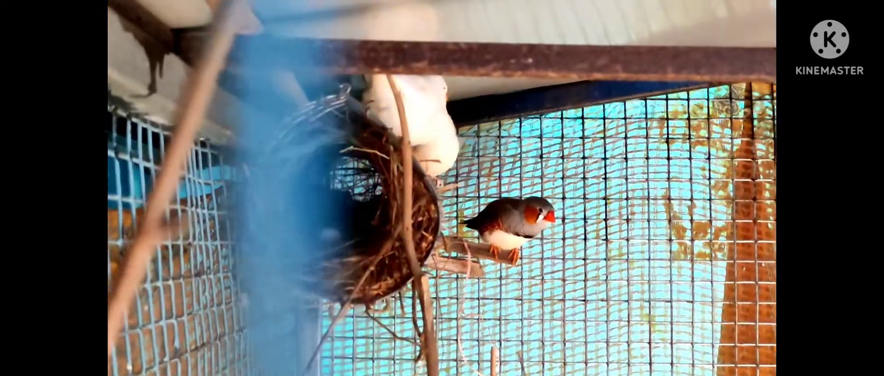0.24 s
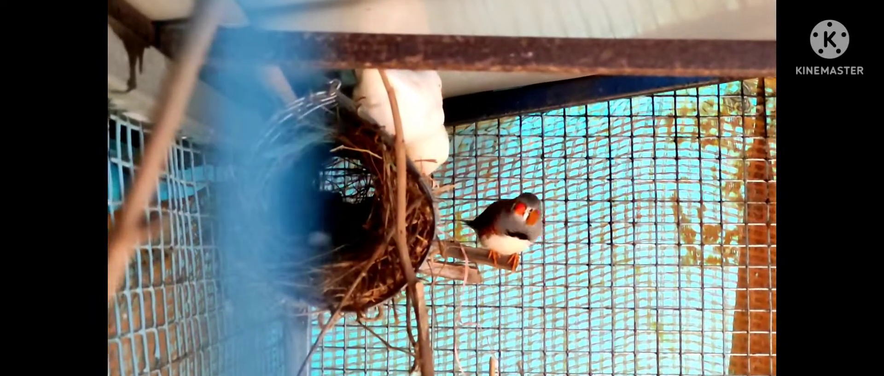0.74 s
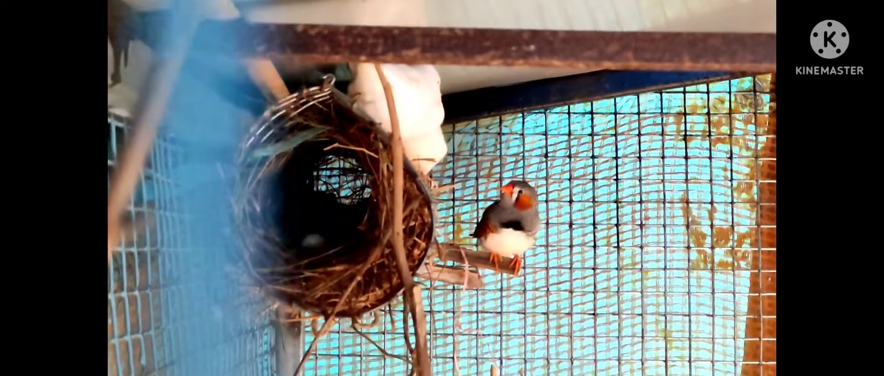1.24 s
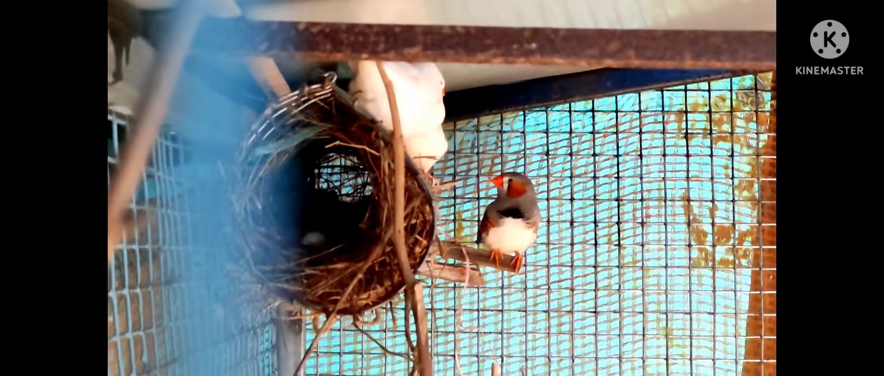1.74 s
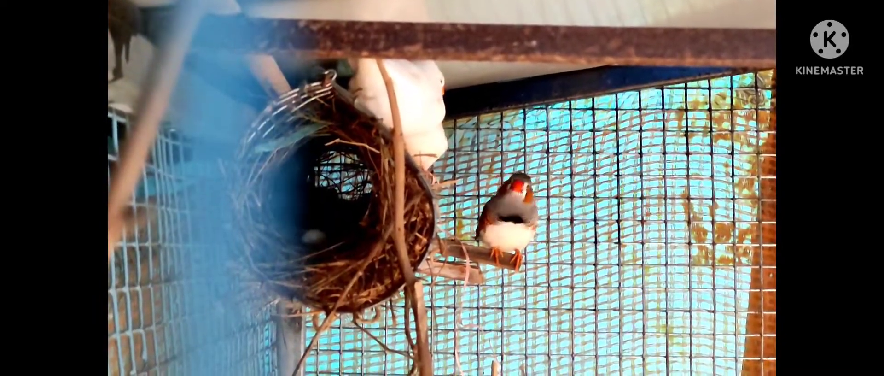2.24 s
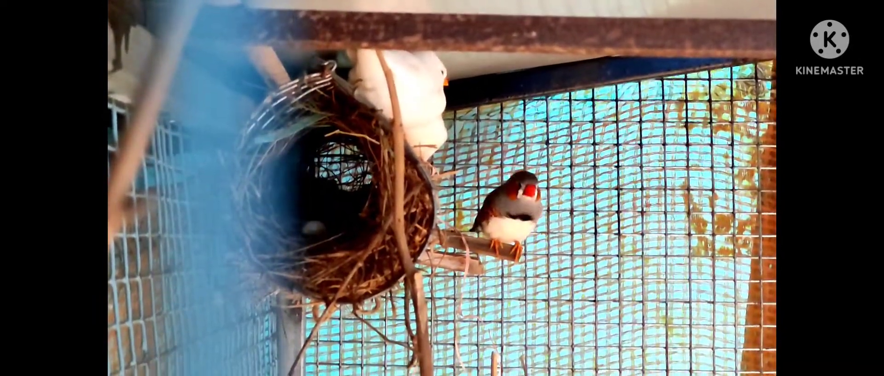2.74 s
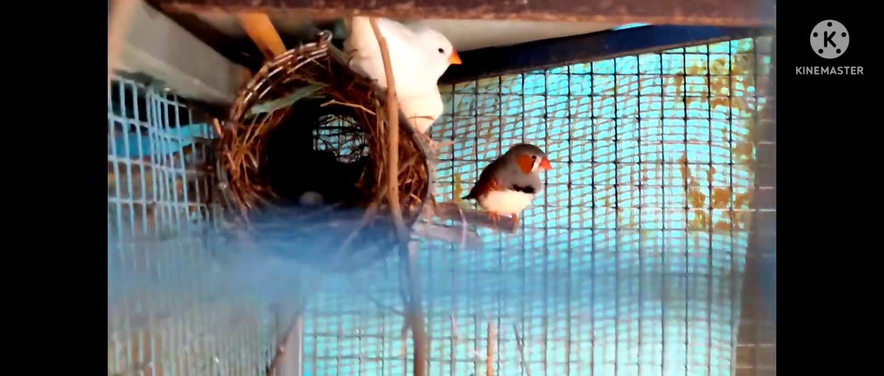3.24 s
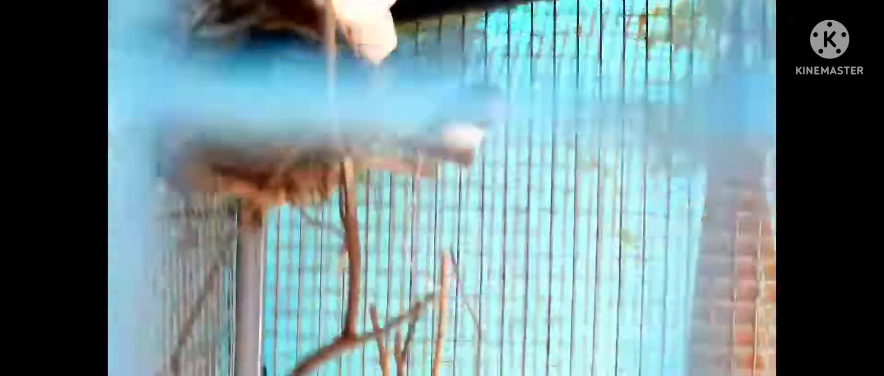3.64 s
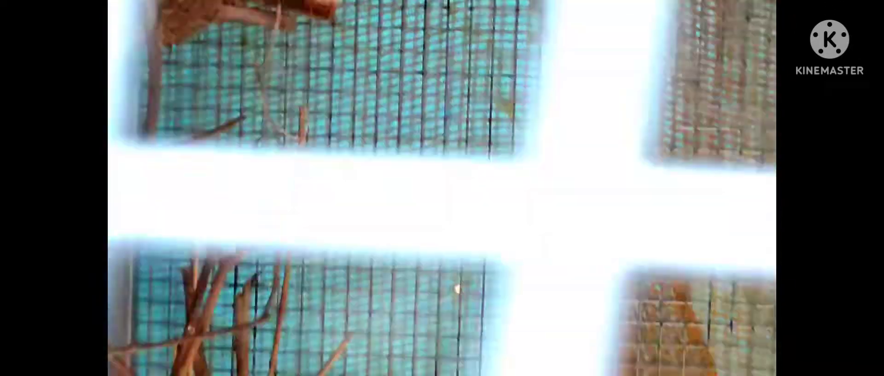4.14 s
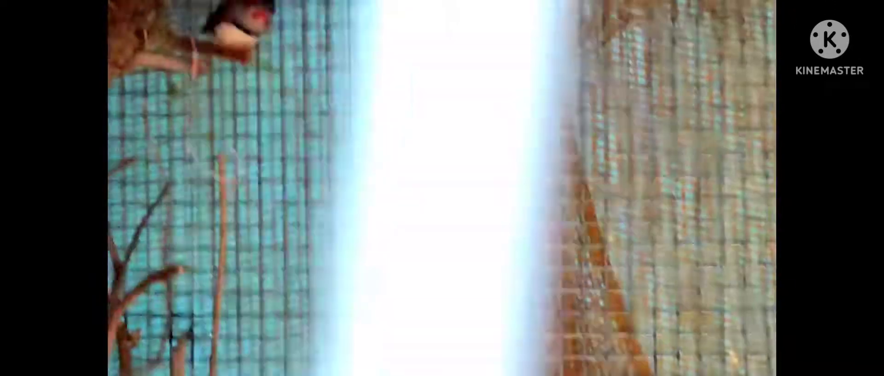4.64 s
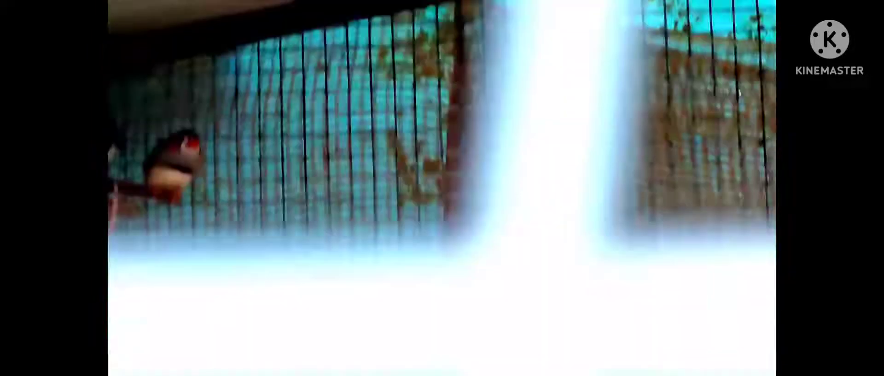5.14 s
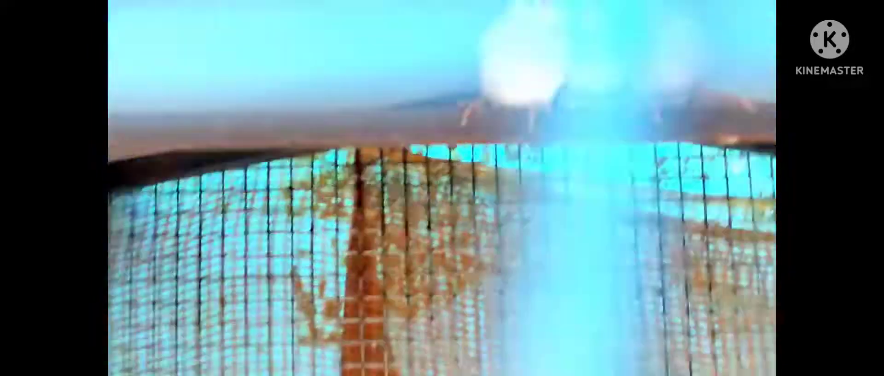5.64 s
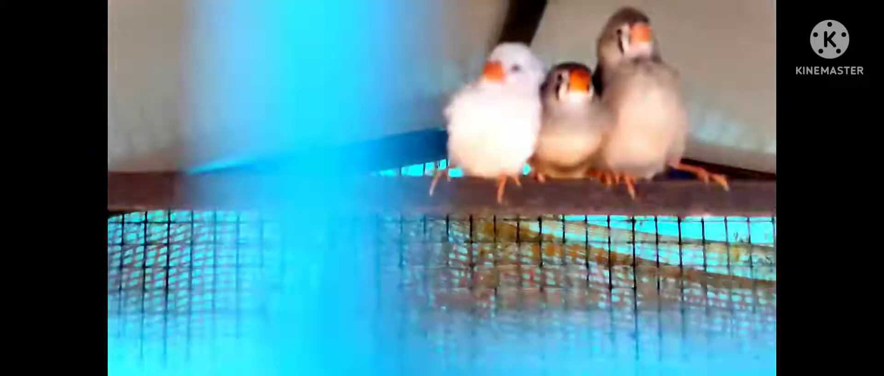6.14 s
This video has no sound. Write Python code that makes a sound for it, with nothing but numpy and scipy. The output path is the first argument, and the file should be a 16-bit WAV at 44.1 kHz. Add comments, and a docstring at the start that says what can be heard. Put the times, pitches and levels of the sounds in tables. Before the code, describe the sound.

Finch chicks beg in steady raspy pulses while adults give short nasal calls, then flutter and squeal loudly in a quick scuffle.

```python
"""Chicks rasp for food and adults whine and call: zebra finches, heard just outside a small wire aviary.
The adults trade falling 'tet' calls and flat nasal 'stack' calls, and a short squabble brings wing beats
and loud squeals. Their tones come from the syrinx, a bird's voice box; the chicks' rasps are rushing air
with a thin squeak. Feet tap on perches, something brushes the mesh twice, and boards and walls echo.
Insects shrill in the quiet air, a hand-held microphone rumbles, and a faint low rustle comes last."""
import sys
import numpy as np
from scipy import signal
from scipy.fft import rfft, irfft, next_fast_len
from scipy.io import wavfile

SR = 44100
rng = np.random.default_rng(int(sys.argv[2]) if len(sys.argv) > 2 else 0)


def master(y):
    """Save y as 16-bit WAV."""
    cut = np.clip(np.atleast_2d(y).T, -1, 1)
    pcm = np.round(cut * 32767)  # scale
    wavfile.write(sys.argv[1], SR, pcm.astype(np.int16))


N = 281799
TOP_HZ = 14300  # upper limit of the treble

# Levels are set before mixing. Roughness runs from 0 (clear) to 1 (hoarse). Pan is left minus right.
# Falling calls. Each row: start in seconds, greatest length in seconds, level in dB.
TET_CALLS = [(0.297, 0.061, -39.5), (0.847, 0.062, -39.5), (1.968, 0.086, -40.5), (2.724, 0.057, -40.5),
             (3.213, 0.11, -39), (4.65, 0.086, -39)]
# How a tet unfolds. Each row: seconds since its start, pitch in Hz, level in dB, roughness (capped at 1).
TET_SHAPE = [(0, 1036, -5.5, 1.08), (.018, 1036, -5.5, 1.11), (.03, 990, 1, .45), (.05, 841.6, -3, 0.27),
             (.072, 705, -3.5, .33), (.096, 625, -6, 0.42)]
# Flat calls. Each row: start and length in seconds, pitch in Hz, mid-call rise in Hz, level in dB.
STACK_CALLS = [(0.455, 0.094, 485, 16.6, -45), (1.232, 0.093, 549, 38.2, -44),
               (2.153, 0.084, 466.6, 24.6, -49.5), (2.934, 0.107, 537, 52, -50.5),
               (4.407, 0.086, 571, 29.6, -51.5), (4.594, 0.074, 466, 3.94, -48.5)]
# How a stack unfolds. Each row: share of its length, share of the rise, level in dB, roughness.
STACK_SHAPE = [(0, .1, -22, .3), (.1, 0.24, 0.5, 0.1), (.27, -0.1, -1.5, 0), (.52, 0.56, 1, 0.14),
               (.78, 0.95, 1, 0), (1, -.4, -1, 0.1)]
# The squabble. Each row: peak time, rise and fall in seconds, pitch in Hz at the start, peak and end,
# level in dB, roughness at the peak, pan in dB.
SQUEAL_CALLS = [(3.668, 0.027, 0.029, 5350, 4760, 4664, -25, 0.17, -4),
                (3.764, 0.044, 0.056, 2326, 4240, 4050, -28, 0.37, -0.5),
                (3.88, 0.0616, .018, 2300, 3807, 3746, -36, 0.42, -6),
                (4.1, .031, 0.04, 5230, 4635, 4660, -22.5, 0.49, -4),
                (4.141, .027, .068, 4240, 4377, 3556, -14.5, .13, -3),
                (4.221, .02, 0.031, 3990, 3875, 3665, -17.5, 0.02, -6.5)]
# Whines that break into a whistle. Each row: start, break and end in seconds, level in dB.
WHINE_CALLS = [(0, 0.094, .15, -44), (1.29, 1.374, 1.406, -37), (1.47, 1.546, 1.592, -37)]
# One chick's slow begging. Each row: start and end in seconds, level in dB, voicing (0 air, 1 squeak).
SLOW_BEGGING = [(-.05, 0.113, -46.5, .02), (0.167, 0.364, -50, .02), (0.427, 0.587, -50, 0.28),
                (0.661, .82, -49, 0.09), (.88, 1.064, -51, 0.03), (1.139, 1.385, -46.5, 0.22),
                (1.406, 1.584, -45, 0.5), (1.668, 1.889, -46.5, 0.68), (1.912, 2.123, -46.5, 0.6),
                (2.178, 2.402, -47.5, 0.6), (2.466, 2.632, -48, 0.44), (2.727, 2.895, -48, 0.34),
                (2.988, 3.203, -50, 0.29), (3.274, 3.481, -48, 0.08), (3.545, 3.69, -48.5, 0.43)]
# Another chick's quicker, shriller begging. Each row: the same four values, then squeak pitch in Hz.
QUICK_BEGGING = [(3.78, 3.99, -43.5, .1, 4400), (4.26, 4.41, -51.5, 0.08, 3880),
                 (4.43, 4.62, -49.5, 0.2, 4650), (4.68, 4.92, -46, 0.24, 4151),
                 (4.97, 5.16, -46.5, 0, 4803), (5.2, 5.38, -46.5, 0.08, 5060),
                 (5.42, 5.58, -46.5, 0.07, 4920), (5.62, 5.78, -49, 0, 4650),
                 (5.815, 5.96, -47.5, 0.16, 4760), (5.995, 6.125, -47.5, 0.15, 5174),
                 (6.16, 6.3, -45, 0.27, 4380), (6.33, 6.46, -44.5, 0.01, 4700)]
# How wide each chick opens its beak. Each row: time in seconds, hiss in dB, shrill resonance in dB.
SLOW_BEAK_OPENING = [(.2, 2, 1.5), (.95, 2, 5.5), (1.45, 0, -18), (2.3, 4, -16), (2.601, -5.5, -6),
                     (3.6, -2.5, -13)]
QUICK_BEAK_OPENING = [(3.8, -1, -1.2), (6.298, 0.62, -0.4)]
# Fluttering swishes: wing beats, then two late brushes against the wire mesh.
# Each row: peak time, rise and fall in seconds, level in dB.
SWISHES = [(3.47, 0.13, 0.12, -53.5), (3.78, 0.13, 0.11, -42.5), (4.1, .2, 0.62, -50),
           (4.62, 0.21, 0.2, -54), (5.575, 0.049, 0.033, -48), (5.69, .05, 0.1, -47.5)]
# Feet and beaks hitting perches and mesh. Each row: time in seconds, level in dB.
PERCH_TAPS = [(2.027, -42), (2.088, -46), (2.198, -48.5), (2.379, -51), (2.655, -55), (3.424, -57),
              (3.665, -51), (4.631, -51), (5.385, -52.5), (5.528, -48), (5.541, -47), (5.61, -43.5),
              (5.625, -47.5), (6.043, -57.5), (6.083, -51.5)]
# The tones a perch rings with. Each row: pitch in Hz, level in dB, seconds to fade by 60 dB.
PERCH_TONES = [(316, -5, 0.07), (558, -2.5, 0.055), (702, -5.5, 0.04), (855, -2.5, 0.044), (996, -9, 0.026),
               (1220, -10, 0.0047), (1529, -4, 0.019), (1597, -22, 0.039)]
# Low rumbles and rubs; the last is a faint low rustle at the end.
# Each row: peak time, rise and fall in seconds, rumble and rub in dB.
RUMBLES_AND_RUBS = [(3.98, .06, 0.93, -44, -62.5), (4.52, .3, 0.86, -44.5, -63),
                    (5.58, 0.15, 0.29, -56, -55), (5.76, .13, 0.065, -45, -49),
                    (6.36, .35, 0.14, -65, -59.5)]
# Shrill insects. Each row: pitch in Hz, level in dB.
INSECT_TONES = [(10660, -65), (10830, -68.5), (11130, -65), (11430, -75)]

# Tone colours: how strong the low and high parts of a sound are. Each row: frequency in Hz, level in dB.
TET_COLOUR = [(400, -17.5), (700, -6), (1000, -8.5), (1400, -0.5), (1950, -6), (2500, -6), (3100, -8.5),
              (3700, 1.5), (4300, -10), (5500, -15.5), (8000, -25), (14000, -42)]  # the adults' throats, one for each kind of voice
STACK_COLOUR = [(400, -25), (560, -5.5), (1100, -1), (1500, 2.5), (2000, 3), (2800, -2), (3500, -7.5),
                (4500, -8), (5500, -25.5), (7500, -23), (9000, -42.5), (14000, -21)]
SQUEAL_COLOUR = [(1000, -24), (1800, -15), (2400, -5), (3000, 0), (3800, 0.5), (4700, -2), (5600, -6),
                 (7000, -11), (8600, -19.5), (10500, -28), (12500, -21.5), (14500, -28)]
WHINE_COLOUR = [(900, -44.5), (1400, -39), (1800, -1.5), (2400, 4), (3100, 5.5), (3500, 10.5), (4200, -1.5),
                (5500, -16), (8000, -16), (10000, -26), (14000, -61)]
SLIDE_COLOUR = [(1400, -6.5), (3100, -1), (4200, -17), (8000, -25), (14000, -51)]
SLOW_THROAT_COLOUR = [(1200, -26), (1700, -11), (1950, -5), (2130, 3), (2330, 3.5), (2550, -1.5),
                      (3000, -21.5), (3600, -42)]  # the chicks' throats and open beaks
SLOW_BEAK_COLOUR = [(1500, -30.5), (3100, -9), (3750, 3), (4200, 3), (4600, 5), (5200, -1), (6100, -4),
                    (7350, -3), (8000, -4.5), (8500, -19), (9800, -11.5), (14000, -40)]
QUICK_THROAT_COLOUR = [(1200, -18), (1540, -13), (1710, 1.5), (2100, -5.5), (2550, 3.5), (2800, -2.5),
                       (3100, -37), (3600, -36)]
QUICK_BEAK_COLOUR = [(2000, -19), (3150, -23), (3650, 0), (4200, -2.5), (4750, 2), (5250, 1.5),
                     (5900, -11.5), (6600, -11), (7700, -9.5), (8500, -23), (10000, -15.5), (14000, -29)]
SWISH_COLOUR = [(100, -15), (300, -1), (600, -1.5), (1500, 0), (3000, -1.5), (5000, -6), (7500, -4.5),
                (10000, -12), (14000, -15)]
TAP_COLOUR = [(150, -34), (380, -5.5), (560, 1.5), (1600, 3), (2600, -10), (6000, -17), (14000, -29)]  # hard perch and mesh give almost no bass
RUMBLE_COLOUR = [(15, -8.5), (25, 4), (29, -4), (34, -13.5), (55, -17), (130, -26.5), (250, -35.5),
                 (600, -47.5), (2000, -84)]  # very deep bass
RUB_COLOUR = [(40, -7), (90, -1.5), (230, -4), (400, -10), (900, -18), (3000, -48)]  # a low, dull rustle
INSECT_COLOUR = [(9800, -12), (10400, -24), (10650, 6), (11000, -1.5), (11500, 9.5), (11900, -18),
                 (13000, -18)]
AIR_COLOUR = [(25, 2.5), (50, -1), (66, -7), (77, 6.5), (92, -8.5), (225, -10), (480, -11.5), (750, -14.5),
              (1260, -18.5), (2100, -13.5), (3500, -17), (6000, -29), (9000, -36), (14000, -34.5)]
WALL_COLOUR = [(200, 8.5), (4000, 1.0), (8000, 1.0), (14000, -11)]


def syrinx(hz, db, rough, doubling, throat, jitter, rasp, harmonics):
    """The voice box buzzes through the throat; roughness shakes the pitch and adds rushing air."""
    size, rough, doubling = len(hz), np.clip(rough, 0, 1), np.clip(doubling, 0, 1)
    phase = phase_of(hz * (1 + jitter * rough * wander(size, 900)))
    tone, power = 0, 1e-12
    # doubling: every second vibration differs, which adds tones halfway between the harmonics
    for k in np.arange(1, 2 * harmonics + 1) / 2:
        gain = gain_at(k * hz, throat) * (k * hz < TOP_HZ) * (doubling if k % 1 else 1)
        tone += gain * np.sin(k * phase + rng.uniform(0, 2 * np.pi))
        power += gain ** 2 / 2
    air_share = np.clip(rasp * rough ** 2, 0, 1)
    voice = np.sqrt((1 - air_share) / power) * tone + np.sqrt(air_share) * noise(size, throat)
    return voice * undb(db) * fade(size, 0.0027)


def contact_calls():
    """Tets start hoarse and slide down until they are cut off; stacks hold a low, slightly arched pitch."""
    out = np.zeros((2, N))
    for start, length, level_db in TET_CALLS:
        hz, db, rough = (column[:int(length * SR)] for column in follow(TET_SHAPE))
        call = syrinx(hz, db + level_db, rough, 0.31 * rough ** 2, TET_COLOUR,
                      jitter=0.05, rasp=0.45, harmonics=14)
        add(out, start, call * fade(len(call), 0.0088), pan_db=-0.5, lag_ms=0.057)
    for start, length, pitch_hz, rise_hz, level_db in STACK_CALLS:
        rise, db, rough = follow(np.array(STACK_SHAPE) * [length, 1, 1, 1])
        call = syrinx(pitch_hz + rise * rise_hz, db + level_db, rough, 0.4 * rough ** 2, STACK_COLOUR,
                      jitter=0.13, rasp=0.63, harmonics=24)
        add(out, start, call, pan_db=1)
    return out


def squeals(edge_db=-15.5, onset_rough=0.53, fray=7, glide=1.3, swing_db=5):
    """Each squeal starts as a screech, clears towards a whistle at its peak and frays as it fades."""
    out = np.zeros((2, N))
    for peak, rise_s, fall_s, first_hz, peak_hz, last_hz, level_db, peak_rough, pan_db in SQUEAL_CALLS:
        before, after = ramps(rise_s, fall_s)
        # a glide above 1 makes the pitch linger at the peak
        hz = peak_hz + (first_hz - peak_hz) * before ** glide + (last_hz - peak_hz) * after ** glide
        db = level_db + edge_db * (before + after) ** 0.91
        rough = np.clip(peak_rough * (1 + fray * after ** 2) + onset_rough * before ** 2, 0, 1)
        call = syrinx(hz, db, rough, 0.74 * rough, SQUEAL_COLOUR, jitter=0.09, rasp=0.3, harmonics=4)
        # loudness and direction flutter quickly while the bird thrashes about
        flutter = unit(undb(2.2 * wander(len(call), 326.2)))
        add(out, peak - rise_s, call * flutter, pan_db + swing_db * wander(len(call), 80), lag_ms=-0.28)
    return out


def whines(whine_hz=1747, whistle_hz=1570, attack_s=0.017, release_s=0.021, slide_lead_s=0.012):
    """A hoarse note drops into a cleaner, slightly softer whistle while a second voice slides up."""
    out = np.zeros((2, N))
    for start, break_s, end, level_db in WHINE_CALLS:
        t = np.arange(start, end, 1 / SR)
        edge = np.maximum(1 - np.minimum((t - start) / attack_s, (end - t) / release_s), 0)
        broken = smooth_step(t - break_s, width_s=0.0063)
        db = level_db - 6 * edge ** 2 - 1.5 * broken
        hz = blend(whine_hz, whistle_hz, broken)
        rough = blend(0.85, 0.23, broken)
        whine = syrinx(hz, db - 5, rough, 0.75 * rough, WHINE_COLOUR,
                       jitter=0.0555, rasp=0.74, harmonics=7)
        add(out, start, whine, pan_db=6.5)
        # the other side of the syrinx slides up just ahead of the break
        slide_hz = blend(1680, 2966, smooth_step(t - break_s + slide_lead_s, width_s=0.00497))
        slide = syrinx(slide_hz, db - 6.5, rough=0.34, doubling=0, throat=SLIDE_COLOUR,
                       jitter=0.108, rasp=0.043, harmonics=4)
        add(out, start, slide, pan_db=-5)
    return out


def chick(rasps, opening, throat, beak, throat_db, hiss_db, squeak_db, grain_db, swell,
          pan_db, lag_ms, waver_hz, arch_hz, shrill_hz=5470, shrill_width_hz=380):
    """Air rushes through the throat and open beak; voicing trades that hiss for a thin, shaky squeak."""
    out = np.zeros((2, N))
    opening_s, *opening_db = np.transpose(opening)
    for start, end, level_db, voicing, squeak_hz in rasps:
        open_db, shrill_db = (np.interp((start + end) / 2, opening_s, db) for db in opening_db)
        size = int((end - start) * SR)
        effort = np.hanning(size)
        # the beak opens a little differently every time
        colour = np.array(beak) + rng.standard_normal((len(beak), 2)) * [50, 1]
        colour[:, 1] += shrill_db * np.exp(-((colour[:, 0] - shrill_hz) / shrill_width_hz) ** 2)
        breath = undb(throat_db) * np.sqrt(1 - voicing) * noise(size, throat)
        hiss = undb(hiss_db + open_db) * (1 - voicing) * noise(size, colour)
        # the squeak rises and falls with the effort of the call
        hz = squeak_hz + arch_hz * (effort - 0.75)
        hz += waver_hz * wander(size, 700) + 35 * wander(size, 29.94)
        tone = unit(np.sin(phase_of(hz)) * undb(4.8 * wander(size, 110.5)))
        squeak = undb(squeak_db) * np.sqrt(voicing) * tone
        grain = unit(undb(grain_db * wander(size, 343.8)))
        rasp = (breath + hiss + squeak) * grain * effort ** swell
        add(out, start, undb(level_db) * rasp, pan_db, lag_ms)
    return out


def swishes(pulse_hz=27, pulse_db=3, edge_db=-9.5):
    """Unevenly pulsing noise swells and fades: wing beats, then two late brushes against the mesh."""
    out = np.zeros((2, N))
    for peak, rise_s, fall_s, level_db in SWISHES:
        db = level_db + edge_db * sum(ramps(rise_s, fall_s))
        size = len(db)
        phase = phase_of(pulse_hz * (1 + 0.3 * wander(size, 21)))
        pulses = unit(undb(pulse_db * np.sin(phase) + 2.1 * wander(size, 300)))
        swish = noise(size, SWISH_COLOUR) * pulses
        add(out, peak - rise_s, swish * undb(db) * fade(size, 0.0069), pan_db=-6.5)
    return out


def taps(scrape_db=-4, scrape_s=0.0043, contact_s=0.0027):
    """A claw scuffs the perch for a moment and makes it ring."""
    out, t = np.zeros((2, N)), np.arange(SR // 8) / SR
    bass_cut = signal.butter(3, 430, "high", fs=SR, output="sos")
    for start, level_db in PERCH_TAPS:
        ring = 0
        for hz, db, ring_s in PERCH_TONES:
            gain = undb(db + 2 * rng.standard_normal())
            pitch = hz * (1 + 0.041 * rng.standard_normal())
            ring += gain * np.sin(2 * np.pi * pitch * t) * die_away(t, ring_s)
        push = noise(len(t), TAP_COLOUR) * np.exp(-t / contact_s)
        knock = unit(signal.fftconvolve(push, ring)[:len(t)])
        scrape = unit(noise(len(t), TAP_COLOUR) * np.exp(-t / scrape_s))
        tap = signal.sosfilt(bass_cut, knock + undb(scrape_db) * scrape)
        tap /= np.std(tap[:SR // 100])  # the first 10 ms set the level
        add(out, start, undb(level_db) * tap, pan_db=-1.5 + 5.5 * rng.standard_normal(), lag_ms=0.13)
    return out


def aviary(dry, near_db, near_s, far_db, far_s):
    """Close boards add a dense, short echo; the walls around add a fainter, longer ring."""
    t = np.arange(SR // 2) / SR
    echoes = []
    for channel in dry:
        near = rng.standard_normal(len(t)) * die_away(t, near_s) * (t > 0.001)
        far = noise(len(t), WALL_COLOUR) * die_away(t, far_s) * (t > 0.012)
        response = (undb(near_db) * unit(near) + undb(far_db) * unit(far)) / np.sqrt(len(t))
        echoes.append(signal.fftconvolve(channel, response)[:N])
    return dry + np.array(echoes)


def rumbles_and_rubs(edge_db=-15.5, side_db=-13, uneven_db=4.5):
    """Low rumbles and uneven rubs from the hand-held microphone; the last is just a faint low rustle."""
    out = np.zeros((2, N))
    for peak, rise_s, fall_s, rumble_db, rub_db in RUMBLES_AND_RUBS:
        swell = undb(edge_db * sum(ramps(rise_s, fall_s)))
        size = len(swell)
        rumble = undb(rumble_db) * noise(size, RUMBLE_COLOUR)
        rub = undb(rub_db + uneven_db * wander(size, 59.8)) * noise(size, RUB_COLOUR)
        add(out, peak - rise_s, (rumble + rub) * swell * fade(size, 0.0105))
        for pan_db in (-12, 12):
            side_rumble = undb(rumble_db + side_db) * noise(size, RUMBLE_COLOUR)
            add(out, peak - rise_s, side_rumble * swell * fade(size, 0.02), pan_db)
    return out


def insects(chorus_db=-64, waver_hz=50, throb_db=5):
    """A few thin, wavering tones throb on either side, over a narrow band of distant shrilling."""
    out = undb(chorus_db) * np.array([noise(N, INSECT_COLOUR) for _ in range(2)])
    for hz, db in INSECT_TONES:
        for pan_db in (-9, 7):
            pitch = hz + waver_hz * wander(N, 9) + 15 * wander(N, 500)
            tone = np.sin(phase_of(pitch)) * undb(throb_db * wander(N, 9.6))
            add(out, 0, undb(db - 7.5) * unit(tone), pan_db)
    return out


def outdoor_air(air_db=-60, side_db=-4):
    """Quiet outdoor air, not quite the same on the left and the right."""
    middle = noise(N, AIR_COLOUR)
    sides = undb(side_db) * np.array([[1], [-1]]) * noise(N, AIR_COLOUR)
    return (middle + sides) * undb(air_db + 0.33 * wander(N, 11))


def undb(db):
    """Turn decibels into a number to multiply by."""
    return 10 ** (np.asarray(db) / 20)


def unit(x):
    """Scale a sound to an average strength (rms) of 1."""
    return x / np.sqrt(np.mean(x ** 2) + 1e-18)


def phase_of(hz):
    """The angle a vibration has turned through as its pitch changes."""
    return 2 * np.pi * np.cumsum(hz) / SR


def gain_at(hz, colour):
    """How strong a tone colour is at the given frequencies."""
    points_hz, db = np.transpose(colour)
    return undb(np.interp(np.log(np.maximum(hz, 1)), np.log(points_hz), db))


def noise(size, colour):
    """Noise of strength 1 with the given tone colour."""
    padded = next_fast_len(size, real=True)
    bins = rfft(rng.standard_normal(padded))
    hz = np.arange(len(bins)) * SR / padded
    return unit(irfft(bins * gain_at(hz, colour), padded)[:size])


def wander(size, rate):
    """Random values, rate of them a second, joined by lines; they spread by about 1."""
    place = np.arange(size) * rate / SR
    return 1.2 * np.interp(place, np.arange(size), rng.standard_normal(size))


def follow(rows):
    """Join rows that begin with a time in seconds by lines: one curve for each other column."""
    times, *columns = np.transpose(rows)
    t = np.arange(times[0], max(times[-1], times[0] + 0.01), 1 / SR)
    return [np.interp(t, times, column) for column in columns]


def ramps(rise_s, fall_s):
    """Two ramps: one runs from 1 to 0 up to a sound's peak, the other from 0 to 1 after it."""
    return follow([(0, 1, 0), (rise_s, 0, 0), (rise_s + fall_s, 0, 1)])


def smooth_step(t, width_s):
    """A smooth step from 0 to 1 around t = 0."""
    return (1 + np.tanh(t / (2 * width_s))) / 2


def blend(first, last, share):
    """Move from first to last as share goes from 0 to 1."""
    return first + (last - first) * share


def die_away(t, ring_s):
    """A level that falls by 60 dB every ring_s seconds."""
    return np.exp(-np.log(1000) * t / ring_s)


def fade(size, edge_s):
    """Fade in and out, each over edge_s seconds."""
    return signal.windows.tukey(size, min(2 * edge_s * SR / size, 1))


def add(out, start, sound, pan_db=0, lag_ms=0):
    """Mix a sound in; the left side gets it pan_db louder and lag_ms later than the right."""
    for channel, side in enumerate((1, -1)):
        at = int((start + side * lag_ms / 2000) * SR)
        part = (sound * undb(side * pan_db / 2))[max(-at, 0):max(N - at, 0)]
        out[channel, max(at, 0):max(at, 0) + len(part)] += part


def scene():
    """All the birds in the aviary, over insects, low rumbles and air."""
    slow_squeak_hz = 2116
    slow_rasps = [(*row, slow_squeak_hz) for row in SLOW_BEGGING]
    chicks = chick(slow_rasps, SLOW_BEAK_OPENING, SLOW_THROAT_COLOUR, SLOW_BEAK_COLOUR,
                   throat_db=-0.3, hiss_db=-0.44, squeak_db=1, grain_db=0.5, swell=0.35,
                   pan_db=-2.5, lag_ms=0.1, waver_hz=88, arch_hz=67)
    chicks += chick(QUICK_BEGGING, QUICK_BEAK_OPENING, QUICK_THROAT_COLOUR, QUICK_BEAK_COLOUR,
                    throat_db=-6.5, hiss_db=-0.4, squeak_db=0.5, grain_db=0.9, swell=0.32,
                    pan_db=-3.5, lag_ms=-0.07, waver_hz=111, arch_hz=372.9)
    # the deeper a bird sits in the cage, the more of its sound comes by way of the boards
    hidden = aviary(chicks, near_db=7, near_s=0.059, far_db=-7, far_s=0.93)
    midway = aviary(contact_calls() + taps() + swishes(),
                    near_db=5, near_s=0.034, far_db=-14.5, far_s=0.29)
    close = aviary(whines() + squeals(), near_db=2.5, near_s=0.082, far_db=-15, far_s=0.52)
    cage = undb(-7) * hidden + undb(-5) * midway + undb(-3) * close
    return cage + insects() + rumbles_and_rubs() + outdoor_air()


def record(dry):
    """A steep filter cuts off the treble above TOP_HZ."""
    return signal.sosfilt(signal.ellip(10, 0.2, 80, TOP_HZ, fs=SR, output="sos"), dry)


dry = scene()
out = record(dry)
master(out)
```